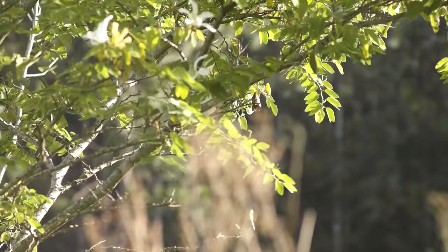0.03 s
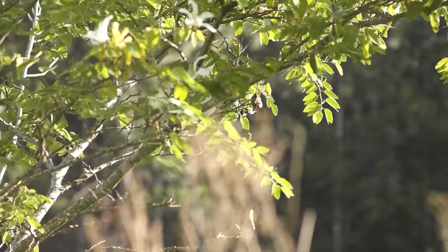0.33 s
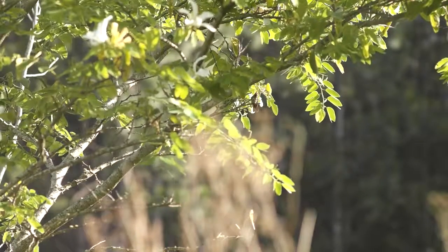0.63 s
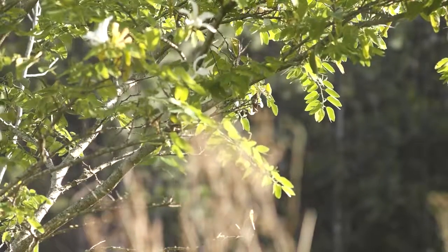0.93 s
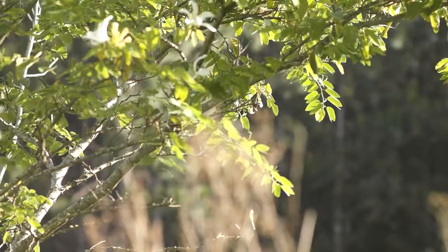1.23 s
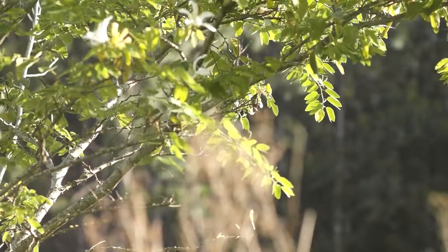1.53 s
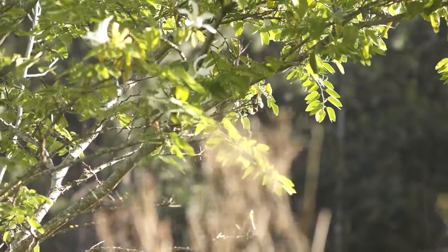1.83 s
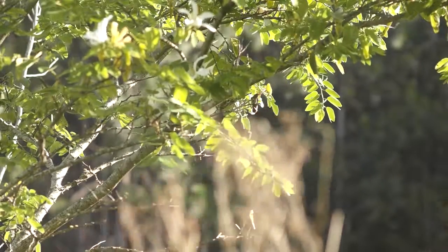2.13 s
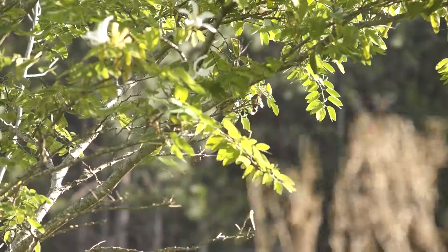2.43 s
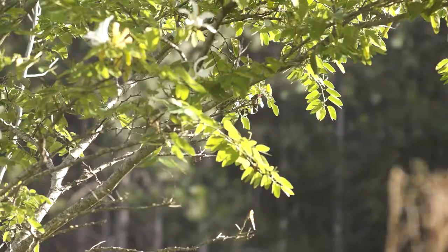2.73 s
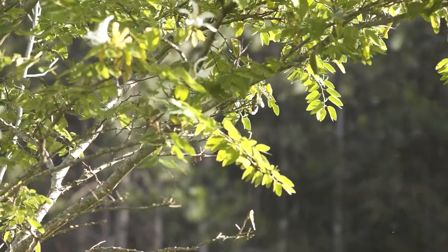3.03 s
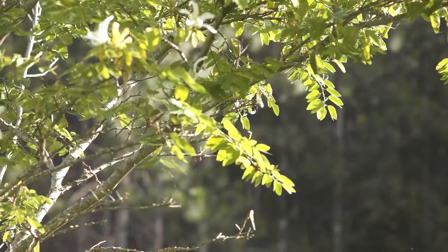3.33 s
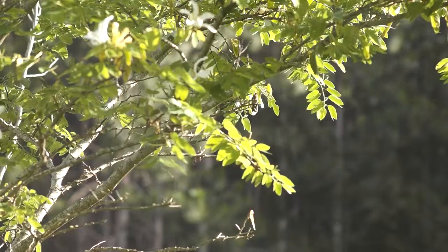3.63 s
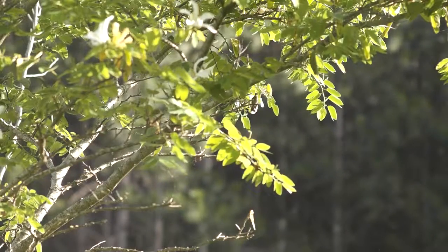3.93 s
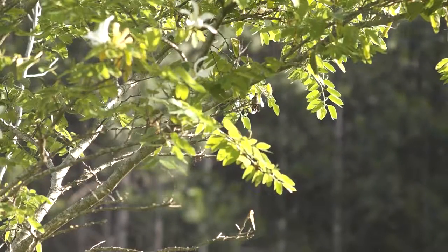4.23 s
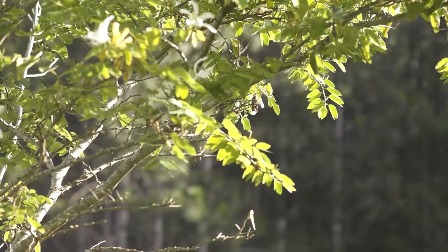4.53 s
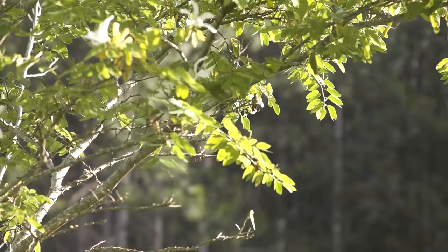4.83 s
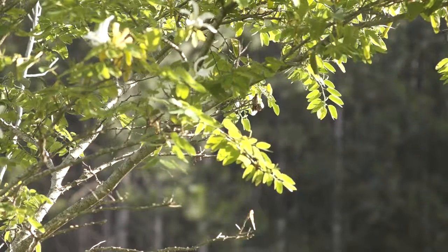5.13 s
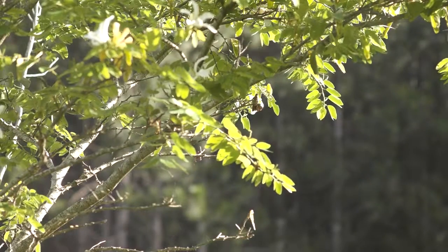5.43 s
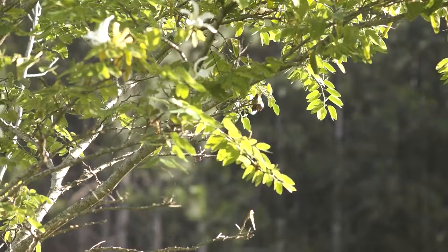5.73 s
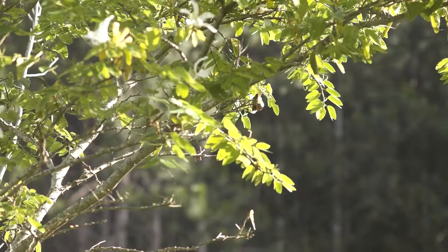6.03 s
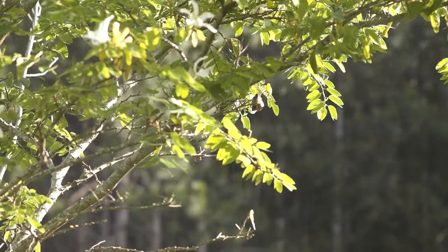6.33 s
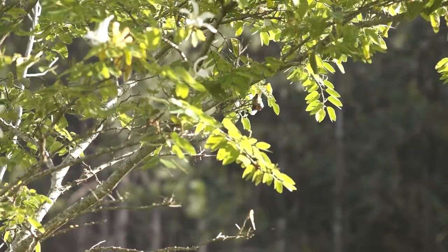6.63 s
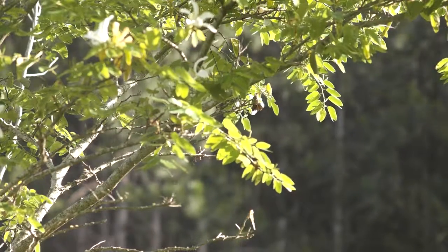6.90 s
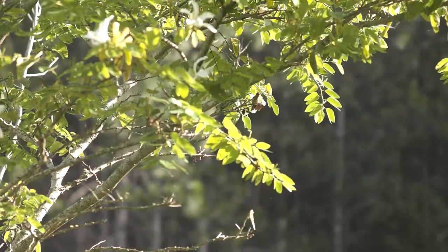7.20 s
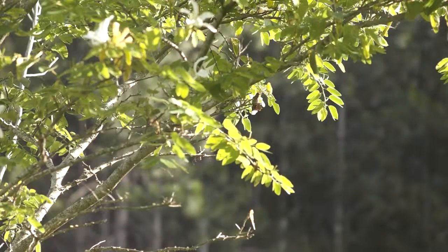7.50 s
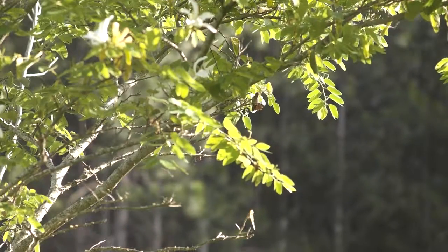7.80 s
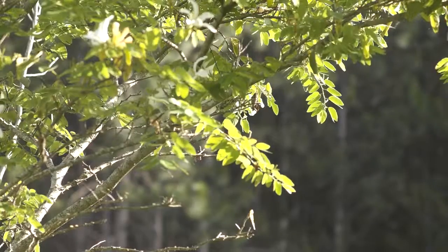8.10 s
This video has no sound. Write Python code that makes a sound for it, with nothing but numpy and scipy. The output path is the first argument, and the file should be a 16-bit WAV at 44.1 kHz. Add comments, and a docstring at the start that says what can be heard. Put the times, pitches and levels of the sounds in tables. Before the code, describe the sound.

At a woodland edge, insects buzz steadily while distant birds chip and scold with a slight echo. About two seconds in, a nearby bird sings one quick, bright phrase ending in a trill and a falling slur. Softer twitters follow, then slow, falling whistles. A light breeze stirs leaves and dry stalks and bumps the microphone, easing after five seconds and returning gently near the end.

```python
"""A woodland edge. From the start insects buzz, a far motor hums, and a light breeze stirs the leaves,
buffets the microphones and rustles dry stalks. Distant birds chip, whistle and scold, echoed by trunks;
their clear notes are bent glides that swell to a crest and fade. At 2.1 s a near bird sings one quick
phrase. The motor fades, and a run of twitters follows at 3.9 s. From 5 s the breeze dies down and slow
whistles sound from the trees; near 7 s breeze and motor return."""
import sys
import numpy as np
from scipy import signal
from scipy.fft import rfft, irfft
from scipy.io import wavfile
from scipy.ndimage import uniform_filter1d

SR = 44100
rng = np.random.default_rng(int(sys.argv[2]) if len(sys.argv) > 2 else 0)


def store_wav(level_fs):
    """Save 16-bit WAV to argv[1]."""
    pcm = np.round(np.clip(np.atleast_2d(level_fs), -1, 1) * 32767)
    wavfile.write(sys.argv[1], SR, pcm.T.astype(np.int16))


N = 359856
T = np.arange(N) / SR


def undb(db):
    """Decibels to gain."""
    return 10 ** (np.asarray(db) / 20)


def unit(x):
    """Scale to rms 1."""
    return x / np.sqrt(np.mean(x ** 2) + 1e-20)


def curve(table):
    """Time-value points joined by straight lines."""
    return np.interp(T, *np.transpose(table))


def add(out, start_s, x):
    """Mix x in at start_s."""
    i = int(np.clip(start_s * SR, 0, N - 1))
    out[..., i:i + x.shape[-1]] += x[..., :N - i]


def pan(x, db):
    """Constant-power pan; db is left minus right."""
    gains = np.array([undb(db / 2), undb(-db / 2)]).reshape(2, -1)
    return x * gains / np.sqrt(np.mean(gains ** 2, axis=0))


def colour(x, spectrum):
    """Impose a spectrum, at rms 1."""
    hz, db = np.transpose(spectrum)
    bins_hz = np.maximum(np.fft.rfftfreq(x.shape[-1], 1 / SR), 1)
    gain = undb(np.interp(np.log(bins_hz), np.log(hz), db))
    return unit(irfft(rfft(x) * gain, x.shape[-1]))


def walk(rate_hz, t=T):
    """Random drift, spread near 1."""
    return np.interp(t * rate_hz, np.arange(4096), rng.standard_normal(4096))


def stereo_noise(correlation):
    """Left and right noise with a shared part."""
    shared = np.sqrt(correlation) * rng.standard_normal(N)
    return shared + np.sqrt(1 - correlation) * rng.standard_normal((2, N))


def arch(size):
    """Half-sine swell."""
    return np.sin(np.linspace(0, np.pi, size))


def woods(x, pan_db, wet_db, t60_s, ground_db=-14, ground_s=0.0036, lag_samples=2, cutoff_hz=9000):
    """Direct sound, ground bounce, then scatter from trunks, dulled by foliage."""
    t = T[:SR]
    scatter = rng.standard_normal((2, SR)) * np.exp(0.46 * rng.standard_normal((2, SR)))
    tail = scatter * undb(-60 * t / t60_s) * (1 - np.exp(-t / 0.011))
    tail /= np.sqrt(np.sum(tail ** 2, axis=1, keepdims=True))
    tail = signal.sosfilt(signal.butter(2, cutoff_hz, fs=SR, output="sos"), tail)
    direct = x + undb(ground_db) * np.roll(x, int(ground_s * SR))
    mics = np.array([np.roll(direct, lag_samples), direct])  # left arrives later
    return pan(mics, pan_db) + undb(wet_db) * signal.fftconvolve(x[None], tail, axes=1)[:, :N]


# swell shared by breeze, insects and far chatter: time_s, level_db
AIR_LEVEL = [(0.0, -66), (1.27, -59), (1.52, -61), (2.79, -59.5), (3.18, -60.5), (4.16, -58.5), (6.54, -73),
             (6.86, -71.5), (7.2, -67), (7.59, -66.5), (8.16, -68.5)]
# tree wash and leaf hiss spectra: freq_hz, density_db
TREE_SPECTRUM = [(30, 9), (100, 6), (190, 0.5), (265, 1), (330, -5), (520, -4), (800, -6.5), (1300, -10.5),
                 (2000, -12), (3000, -12), (4300, -12.5), (5500, -17), (8000, -41)]
LEAF_SPECTRUM = [(2000, -6), (5000, -4), (7500, 6.5), (9500, 4.5), (11800, 8), (13400, -1)]

def breeze(trees_db=8.5, leaves_db=-0.2):
    """Air moving through the crowns: low wash, flickering leaf hiss."""
    air_db = curve(AIR_LEVEL)
    wash = colour(stereo_noise(0.26), TREE_SPECTRUM) * undb(air_db + trees_db + 1.32 * walk(11))
    hiss = colour(stereo_noise(0.03), LEAF_SPECTRUM) * undb(air_db + leaves_db + 0.96 * walk(25))
    return pan(wash + hiss, -1)


# insect chorus spectrum: freq_hz, density_db
CHORUS_SPECTRUM = [(4200, -36), (5000, -22), (5350, -9), (5600, -7), (5740, -3), (5900, -6), (6060, -10.5),
                   (6270, -8.5), (6500, -16), (6850, -18), (7400, -35.5)]

def insects(stroke_hz=48, depth=0.46, wing_hz=5732, chorus_db=7, near_db=-1):
    """A blurred chorus, and a nearer insect whose wing strokes ring a narrow resonance."""
    stroke_phase = 2 * np.pi * np.cumsum(stroke_hz * (1 + 0.0514 * walk(9))) / SR
    strokes = (1 + depth * np.sin(stroke_phase)) ** 2
    sidebands = walk(160) + 1j * walk(160) + walk(22) + 1j * walk(22)
    ring = (sidebands * np.exp(2j * np.pi * wing_hz * T)).real
    near = undb(near_db) * pan(unit(ring * strokes), -2.3)
    chorus = colour(stereo_noise(0.049), CHORUS_SPECTRUM)
    chorus *= undb(chorus_db + 0.83 * walk(40) + 0.5 * walk(2.94))
    return (pan(chorus, -1.8) + near) * undb(curve(AIR_LEVEL))


# steady wind on the microphones: time_s, level_db
WIND_LEVEL = [(0, -53.5), (.9, -43), (1.5, -50.5), (2.6, -38), (3.8, -47), (4.4, -44.5), (5.1, -64),
              (6.4, -78), (7.0, -77), (7.4, -62.5), (8.16, -58)]
# strongest eddies: peak_s, level_db, pan_db
EDDY_HITS = [(.141, -40, 13), (.44, -42, 6), (.799, -34.5, -22), (0.962, -27.5, -34), (1.04, -30.5, -3),
             (1.57, -37, -7), (1.757, -24.5, -23), (1.82, -34.5, -4), (2.15, -38, -11), (2.248, -26.5, 15),
             (2.341, -22.5, -16), (2.701, -31.5, 8), (3.14, -32.5, -2), (3.329, -28.5, -14),
             (3.57, -33, -18), (3.84, -28.5, 2), (4.251, -31, 14), (4.633, -37.5, -0.5), (7.231, -46, 9),
             (7.362, -49.5, -4), (8.13, -39.5, -10)]
# rumble and eddy spectra: freq_hz, density_db
RUMBLE_SPECTRUM = [(10, 3.5), (22, 6), (45, -7.5), (65, -6.5), (100, -39), (160, -36), (300, -62),
                   (900, -85)]
EDDY_SPECTRUM = [(10, -18), (24, 4.5), (45, 3.5), (70, -5), (105, -19), (160, -33.5), (300, -61),
                 (900, -75)]

def buffeting(eddy_s=0.02, evenness=0.17, rumble_db=5, gust_db=3):
    """Wind on the microphones: gusty rumble, and eddies that thump one more than the other."""
    rumble = colour(stereo_noise(0.017), RUMBLE_SPECTRUM)
    rumble *= undb(curve(WIND_LEVEL) + rumble_db + gust_db * walk(12))
    force = sum(pan(undb(level_db) * np.exp(-0.5 * ((T - peak_s) / eddy_s) ** 2), pan_db)
                for peak_s, level_db, pan_db in EDDY_HITS)
    swirl = colour(rng.standard_normal((2, N)), EDDY_SPECTRUM)  # faster air, higher band
    envelope = np.sqrt(uniform_filter1d(np.abs(signal.hilbert(swirl)) ** 2, size=900))
    return pan(rumble, -0.35) + force * unit(swirl / envelope ** evenness)


# motor swells: start_s, length_s, firing_hz, level_db
MOTOR_SWELLS = [(0, 3.4, 243.1, -63), (6.95, 1.44, 237.3, -69)]
# motor partials: harmonic, level_db
MOTOR_PARTIALS = [(1, -7), (2, -2.5), (3, -11.5), (5, -10), (6, -14)]

def motor(wander=0.018, jitter=0.01402):
    """Far hum: speed wanders, partials fade in and out on the way through the trees."""
    out = np.zeros(N)
    for start_s, length_s, firing_hz, level_db in MOTOR_SWELLS:
        t = T[:int(length_s * SR)]
        speed = 1 + wander * walk(4, t) + jitter * walk(25, t)
        phase = 2 * np.pi * np.cumsum(firing_hz * speed) / SR
        hum = sum(undb(db + 3.7 * walk(8.2, t)) * np.sin(k * phase) for k, db in MOTOR_PARTIALS)
        add(out, start_s, hum * undb(level_db) * np.sqrt(np.abs(arch(len(t)))))
    return woods(out, pan_db=-2.5, wet_db=-5.5, t60_s=0.57)


# stalk swishes: start_s, length_s, level_db
STALK_SWISHES = [(0.127, 0.29, -60.5), (0.8, 0.19, -52), (1.012, 0.12, -57), (6.97, 0.34, -59),
                 (7.324, 0.17, -61), (7.862, 0.63, -56)]
# twig and stalk snaps: start_s, crack_db, knock_db
TWIG_SNAPS = [(0.2813, -35.5, -70), (.873, -52, -51), (.935, -40, -58), (3.7657, -29, -33.5),
              (3.772, -46, -53), (6.817, -47, -74), (7.039, -46.5, -50.5), (7.456, -41, -59),
              (7.965, -43, -71)]
# swish and crack spectra: freq_hz, density_db
SWISH_SPECTRUM = [(1000, -19), (2700, -0.5), (5000, 0.5), (9000, -4), (11500, 7), (13500, 0)]
CRACK_SPECTRUM = [(300, -10), (1500, -2.5), (3000, 0.5), (5500, 4), (8500, -1), (13000, -1.5)]
# struck twig modes: freq_hz, decay_s, level_db
TWIG_MODES = [(315, 0.005, -14.5), (496, 0.0019, 5), (1020, 0.00081, 0), (2770, 0.00052, 10)]

def stalks(grain=0.52):
    """Dry stalks brush in dense tiny ticks; now and then one snaps or knocks."""
    swell = np.zeros(N)
    for start_s, length_s, level_db in STALK_SWISHES:
        add(swell, start_s, undb(level_db) * arch(int(length_s * SR)))
    out = swell * colour(stereo_noise(0.31) * np.exp(grain * walk(480)), SWISH_SPECTRUM)
    t = T[:2048]
    decay = np.exp(-t / 0.0022) + 0.16 * np.exp(-t / 0.04)
    knock = sum(undb(db) * np.sin(2 * np.pi * hz * t) * np.exp(-t / decay_s)
                for hz, decay_s, db in TWIG_MODES)
    for start_s, crack_db, knock_db in TWIG_SNAPS:
        burst = (rng.standard_normal(len(t)) + 0.57 * rng.standard_normal((2, len(t)))) * decay
        crack = colour(np.pad(burst, ((0, 0), (0, len(t)))), CRACK_SPECTRUM)[:, :len(t)]
        crack /= 2 * np.std(crack[:, :64])
        add(out, start_s, undb(crack_db) * crack + undb(knock_db) * knock)
    return pan(out, -2.4)


def glide(length_s, start_hz, mid_hz, end_hz, level_db, crest_frac=0.57, edge_db=-10, roundness=1.25):
    """Note contour: pitch bends through three values; level crests, edge_db lower at the ends."""
    u = np.linspace(0, 1, 33)
    bend = np.polyfit([0, 0.5, 1], np.log([start_hz, mid_hz, end_hz]), 2)
    from_crest = np.interp(u, [0, np.clip(crest_frac, 0.02, 0.98), 1], [1, 0, 1])
    return u * length_s, np.exp(np.polyval(bend, u)), level_db + edge_db * from_crest ** roundness


def syrinx(contour, waver, flutter_db=2.2, warble_hz=125, warble=0, throb=0, overtone_db=-42):
    """A near sine along a contour; a fast shake can move pitch (warble) and level (throb)."""
    time_s, hz, db = contour
    t = np.arange(max(int(time_s[-1] * SR), 256)) / SR
    shake = np.cos(2 * np.pi * warble_hz * t)
    pitch_hz = uniform_filter1d(np.interp(t, time_s, hz), size=130)
    pitch_hz *= 1 - warble * shake * arch(len(t)) + waver * walk(399, t)
    phase = 2 * np.pi * np.cumsum(pitch_hz) / SR
    edges = np.clip(np.minimum(t, t[-1] - t) / 0.0012, 0, 1)
    gain = edges * undb(np.interp(t, time_s, db) + flutter_db * walk(256, t)) * (1 - throb * shake)
    return np.sqrt(2) * gain * (np.sin(phase) + undb(overtone_db) * np.sin(2 * phase))


def notes(rows, edge_db, **voice):
    """Sing each row as a glide at its start time."""
    out = np.zeros(N)
    for start_s, *note in rows:
        add(out, start_s, syrinx(glide(*note, edge_db=edge_db), **voice))
    return out


def repeated(syllable, start_s, period_s, level_db, fade_db=0, sag=0, count=2):
    """Rows for an evenly repeated syllable; each repeat drops by fade_db in level and sag in pitch."""
    return [(start_s + k * period_s + offset_s, length_s, *np.multiply(hz, 1 - k * sag),
             level_db + db - k * fade_db, crest_frac)
            for k in range(count) for offset_s, length_s, *hz, db, crest_frac in syllable]


def far_chatter(pitch_hz=3500, spread=0.13, bend=0.1, length_s=0.038, over_air_db=-6, count=36):
    """Faint random slurs from deep in the wood, mostly echo."""
    rows = []
    for start_s, z in zip(rng.uniform(0, T[-1], count), rng.standard_normal((count, 6))):
        glide_hz = pitch_hz * np.exp(spread * z[1] + bend * z[2:5])
        rows.append((start_s, length_s * np.exp(0.306 * z[0]), *glide_hz, 1.5 * z[5]))
    slurs = notes(rows, edge_db=-3, waver=0.015) * undb(curve(AIR_LEVEL) + over_air_db)
    return woods(slurs, pan_db=-4, wet_db=6.5, t60_s=0.34)


# short slurs: start_s, length_s, start_hz, mid_hz, end_hz, level_db
SLUR_NOTES = [(.244, 0.046, 3070, 3030, 2830, -62.5), (.402, .034, 2510, 2805, 2940, -60),
              (1.56, 0.023, 5220, 5470, 5450, -48.5), (3.629, 0.063, 3300, 3790, 2940, -55.5),
              (3.778, .058, 2900, 3550, 3050, -54), (3.835, 0.023, 4360, 4280, 3600, -51.5),
              (3.873, .023, 4400, 3840, 3540, -54), (4.644, 0.039, 3470, 2980, 3050, -59.5),
              (5.322, .17, 2950, 2900, 2870, -73.5), (5.41, 0.13, 4100, 4170, 4140, -71),
              (5.676, .03, 3080, 4000, 4400, -66), (7.558, 0.0089, 3370, 4100, 4450, -60.5)]
# chip pairs: start_s, level_db
CHIP_CALLS = [(0.365, -51.5), (1.124, -47.5), (1.983, -49), (2.703, -47), (3.481, -47), (4.951, -54),
              (5.865, -59), (6.644, -60.5), (7.432, -55)]
# syllables: offset_s, length_s, start_hz, mid_hz, end_hz, level_db, crest_frac
CHIP_SYLLABLE = [(0.0012, .029, 5320, 5280, 4780, 0, 0.51)]
TWITTER_SYLLABLE = [(.008, 0.0152, 3680, 3360, 2960, -3.5, 0.63), (.024, .011, 4300, 3890, 3760, -4, 0.36),
                    (.034, .019, 3930, 4550, 5250, -2, 1)]

def small_birds():
    """Scattered slurs, paired chips and one run of twitters."""
    slurs = notes(SLUR_NOTES, edge_db=-3.5, waver=0.0098, flutter_db=2)
    pairs = [note for start_s, db in CHIP_CALLS
             for note in repeated(CHIP_SYLLABLE, start_s, period_s=0.063, level_db=db)]
    chips = notes(pairs, edge_db=-9.5, waver=0.0034)
    run = repeated(TWITTER_SYLLABLE, start_s=3.925, period_s=0.0792, level_db=-45.5,
                   fade_db=1.03, sag=0.0084, count=9)
    twitters = notes(run, edge_db=-9, waver=0.027, flutter_db=1)
    return (woods(slurs + chips, pan_db=-4.5, wet_db=-3, t60_s=0.79)
            + woods(twitters, pan_db=-6, wet_db=-0.5, t60_s=0.72, ground_db=-7))


# long whistles: start_s, length_s, start_hz, mid_hz, end_hz, level_db, crest_frac
WHISTLE_NOTES = [(.335, 0.27, 4300, 3650, 3190, -61, 0.6), (5.745, 0.24, 5250, 4080, 3970, -65, .5),
                 (6.14, 0.16, 4400, 4120, 3850, -68.5, .5), (6.34, 0.22, 3650, 3434, 3265, -63, 0.74),
                 (6.78, 0.21, 5600, 4290, 3780, -54, 0.31), (7.165, 0.18, 6330, 6700, 6890, -55.5, .8),
                 (7.3, .14, 6700, 4180, 3390, -48.5, 0.32)]

def whistler():
    """Slow, pure whistles, mostly falling, that hang in the trees."""
    whistles = notes(WHISTLE_NOTES, edge_db=-11.5, waver=0.0039, flutter_db=2.5)
    return woods(whistles, pan_db=-7.5, wet_db=-3, t60_s=0.74, ground_db=-30)


# harsh notes: start_s, length_s, pitch_hz, width_hz, level_db
RASP_NOTES = [(0.93, 0.077, 1434, 250, -63), (1.698, 0.21, 2730, 1402, -60.5),
              (1.87, 0.036, 2450, 906, -53), (1.958, 0.13, 2540, 1163, -56),
              (2.209, 0.07, 4180, 986, -51.5), (2.278, .033, 2920, 1230, -54),
              (2.349, .022, 2580, 790, -56.5), (2.416, 0.016, 2630, 1040, -56),
              (2.783, 0.087, 1447, 248, -59.5), (3.418, .093, 2500, 798, -61),
              (4.05, 0.054, 2930, 407, -55.5), (4.183, .34, 2240, 457, -64.5),
              (4.834, .08, 3330, 1500, -65), (4.957, 0.35, 2283, 419, -65.5),
              (5.043, 0.051, 3720, 1900, -62), (5.198, 0.63, 2260, 547, -72), (5.515, 0.06, 2960, 390, -65),
              (7.745, .05, 2960, 253, -70)]

def scolding(rattle_hz=50, depth=0.3):
    """Harsh calls: an unsteady tone chopped into a rattle."""
    out = np.zeros(N)
    for start_s, length_s, pitch_hz, width_hz, level_db in RASP_NOTES:
        t = T[:int(length_s * SR)]
        sidebands = walk(width_hz, t) + 1j * walk(width_hz, t)
        tone = (sidebands * np.exp(2j * np.pi * pitch_hz * t)).real
        rattle = 1 - depth * np.cos(2 * np.pi * rattle_hz * t + walk(36, t))
        swell = np.sqrt(np.abs(arch(len(t))))
        add(out, start_s, undb(level_db) * unit(tone * rattle * swell))
    return woods(out, pan_db=-5, wet_db=-10.5, t60_s=1.0)


# single notes: start_s, length_s, start_hz, mid_hz, end_hz, level_db, crest_frac
OPENING_NOTES = [(2.124, 0.025, 4980, 5870, 5950, -37, 0.93), (2.134, .045, 6750, 6990, 6900, -45, 0),
                 (2.155, 0.031, 5190, 4650, 4600, -37.5, .35)]
SHARP_CHIP_NOTE = [(2.468, 0.032, 5830, 4710, 4300, -25.5, 0.65)]
TRILL_NOTE = [(2.976, .049, 4480, 4400, 3900, -30, 0.59)]
FALL_NOTES = [(3.058, .062, 4140, 3190, 2470, -39.5, 0.78), (3.112, .103, 2566, 2263, 2045, -42.5, 0.089)]
# rolling syllable: offset_s, length_s, start_hz, mid_hz, end_hz, level_db, crest_frac
ROLL_LEAD = [(.005, .025, 3400, 3510, 3870, -11, 0.97)]
ROLL_BODY = [(.03, .013, 4110, 4060, 3660, -0.5, 0.52), (.041, 0.0128, 3650, 3080, 2440, -7, 0.68),
             (.067, .025, 2070, 2310, 2488, -9.5, 0.6)]

def near_bird():
    """Hoarse opening, sharp chip, four rolling syllables, buzzy trill, long falling slur."""
    opening = notes(OPENING_NOTES, edge_db=-9, waver=0.026, flutter_db=4)
    chip = notes(SHARP_CHIP_NOTE, edge_db=-17, waver=0.0067, flutter_db=2)
    fall = notes(FALL_NOTES, edge_db=-12, waver=0.0081, flutter_db=2.5)
    trill = notes(TRILL_NOTE, edge_db=-8.5, waver=0.0034, warble_hz=133, warble=0.058, throb=0.39)
    pace = dict(start_s=2.514, period_s=0.1115, count=4)
    leads = notes(repeated(ROLL_LEAD, level_db=-32, fade_db=-0.8, sag=0.026, **pace),
                  edge_db=-9, waver=0.03, warble_hz=110, warble=0.035, throb=0.49)
    rolls = notes(repeated(ROLL_BODY, level_db=-31, fade_db=0.6, sag=0.0099, **pace),
                  edge_db=-8.5, waver=0.018, flutter_db=2.3, warble_hz=336, warble=0.008, throb=0.19)
    # clear notes beam ahead; the others spread wider into the trees
    beamed = woods(chip + trill + fall, pan_db=-6.5, wet_db=-13.5, t60_s=0.69,
                   ground_db=-12, lag_samples=3, cutoff_hz=4440)
    spread = woods(opening + leads + rolls, pan_db=-6, wet_db=-7.5, t60_s=1.0,
                   lag_samples=3, cutoff_hz=6030)
    return beamed + spread


def scene():
    """Birds over insects, wind, stalks and the far motor."""
    birds = near_bird() + whistler() + small_birds() + scolding() + far_chatter()
    return birds + insects() + breeze() + buffeting() + stalks() + motor()


def record(dry):
    """Steep treble cut."""
    cutoff_hz = 13800
    return signal.sosfilt(signal.ellip(10, 0.2, 80, cutoff_hz, fs=SR, output="sos"), dry)


dry = scene()
out = record(dry)
store_wav(out)
```